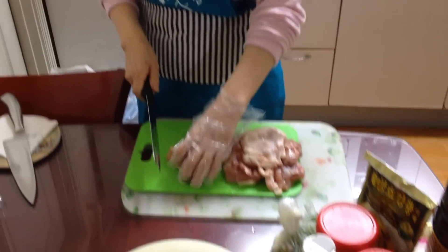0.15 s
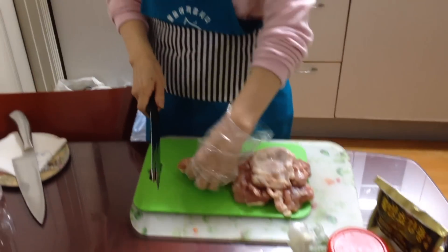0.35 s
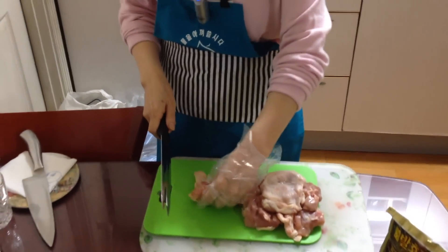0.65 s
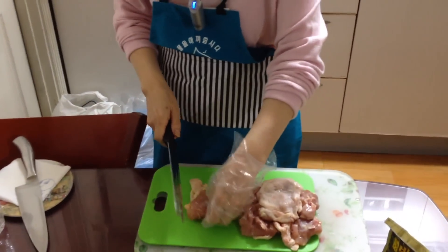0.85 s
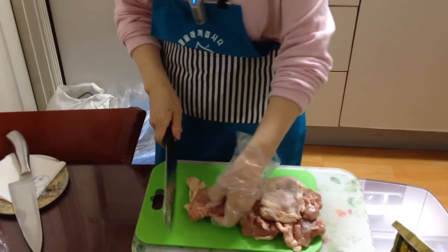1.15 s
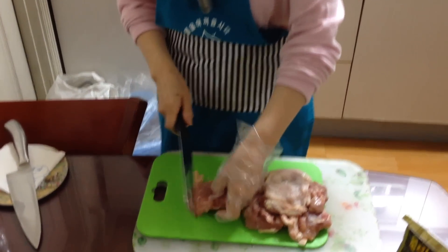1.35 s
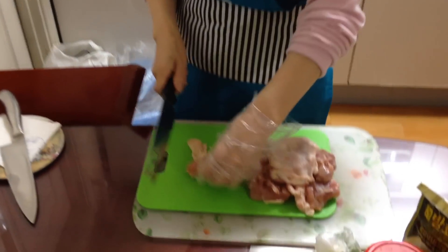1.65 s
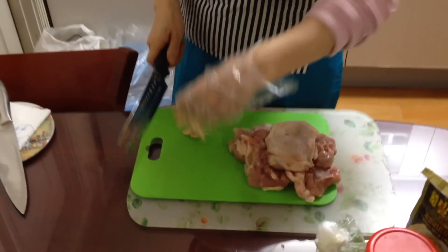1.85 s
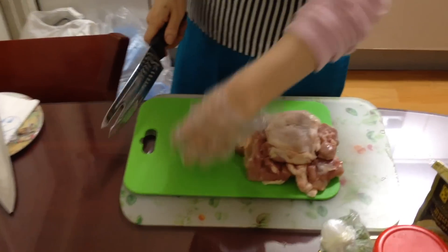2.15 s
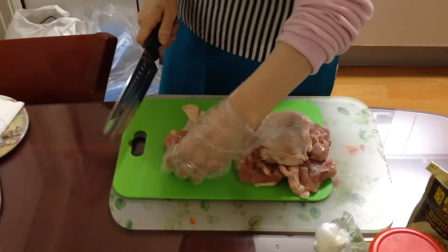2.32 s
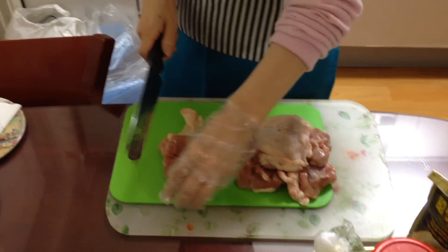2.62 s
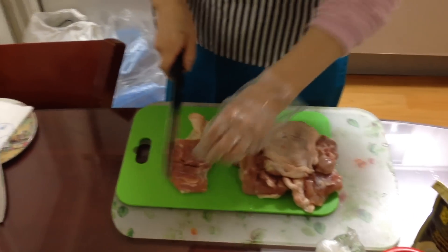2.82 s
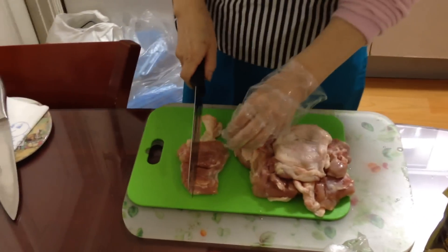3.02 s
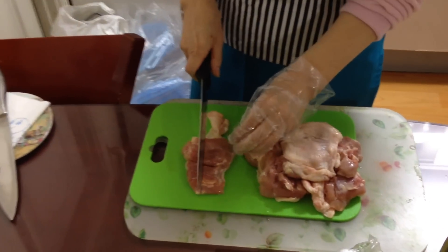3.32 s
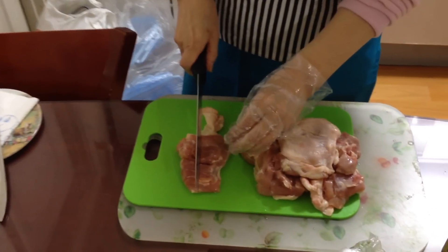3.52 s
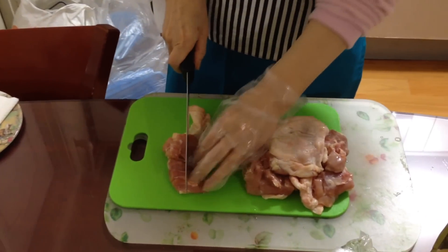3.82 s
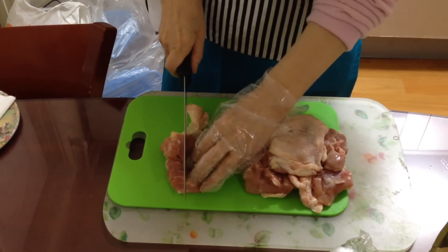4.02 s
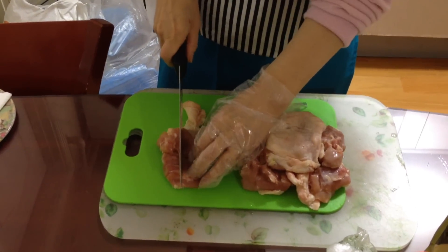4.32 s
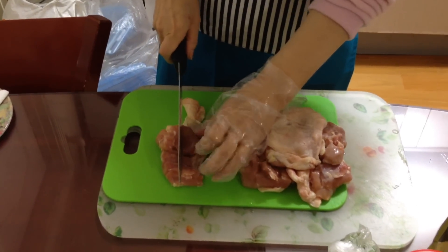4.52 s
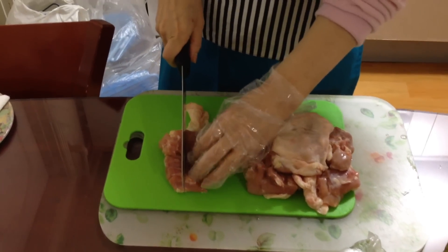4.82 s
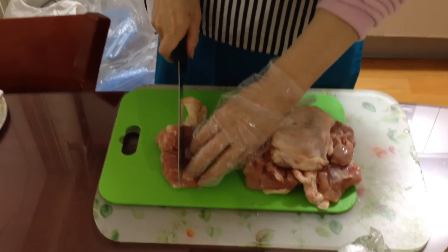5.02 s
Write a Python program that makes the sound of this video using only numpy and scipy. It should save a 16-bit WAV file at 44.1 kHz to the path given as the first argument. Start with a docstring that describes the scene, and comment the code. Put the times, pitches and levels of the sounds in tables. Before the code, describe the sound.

A thin plastic glove crinkles and crackles busily, with a few small knife knocks on a plastic board, then thins to sparse ticks in a quiet kitchen.

```python
"""A thin plastic glove crackles as the hand in it handles raw meat on a plastic cutting board.
Dense tiny damped grains make the rasp of the film; larger bursts make its single snaps, and trapped air rings.
A blade or knuckle excites the modes of the board, the blade ticks on it and meat flops as soft low pushes.
Filtered noise is the quiet kitchen air and a humming appliance; decaying noise is the small room's answer."""
import sys
import numpy as np
from scipy import signal
from scipy.fft import rfft, irfft, next_fast_len
from scipy.io import wavfile
from scipy.ndimage import map_coordinates

SR = 44100
rng = np.random.default_rng(int(sys.argv[2]) if len(sys.argv) > 2 else 0)


def generate_wav(sig):
    """Save sig (samples, or channels by samples) to the path in sys.argv[1] as 16-bit PCM at SR."""
    pcm = np.round(np.clip(np.atleast_2d(sig).T, -1, 1) * 32767).astype(np.int16)
    wavfile.write(sys.argv[1], SR, pcm)


N = 227600  # length in samples

# Table levels are relative: each sound's function adds its own trim.
# the hand's steady fidgeting in the glove: [t/s, crackle level/dB]
FIDGETING = [(0, -45.5), (.08, -45), (.19, -44), (.3, -43), (.6, -42.5), (.72, -51), (.93, -43),
             (1.15, -49.5), (1.3, -47), (1.7, -50.5), (2.15, -57.5), (2.45, -45.5), (2.7, -46), (2.8, -54),
             (3.05, -59.5), (3.3, -72), (3.56, -80), (3.75, -50.5), (3.97, -49.5), (4.03, -53), (4.09, -61),
             (4.14, -86), (4.3, -81), (4.45, -64), (4.75, -57.5), (4.815, -62), (4.86, -57.5),
             (4.92, -58.5), (4.955, -66), (4.99, -57), (5.16, -63)]
# squeezes of the glove that swell to a peak and die:
# [peak t/s, crackle level/dB, rise t/s, fall t/s, large-fold level/dB, middle-fold level/dB]
GLOVE_SQUEEZES = [(0.002, -27.5, 0.011, 0.01, -5, -5), (.166, -41.5, 0.0093, 0.011, 15.5, -2),
                  (.215, -40, 0.0086, .03, -17, -2), (.228, -36, 0.012, 0.043, -2, -6),
                  (.33, -41, 0.068, 0.05, 5, 2), (.372, -35.5, 0.015, 0.033, -1, 1.5),
                  (0.394, -34.5, 0.019, 0.019, -4, 0), (.418, -45, .03, .01, 6, -3),
                  (0.489, -35, 0.043, 0.019, -2, 3), (.63, -44, 0.14, 0.015, -8, -5),
                  (0.809, -41.5, 0.2, 0.06, 0.5, 4), (.885, -39, 0.039, 0.042, -6, -3),
                  (.98, -41, 0.028, 0.018, -3, 3), (1.21, -39, 0.018, 0.014, -2, 2.5),
                  (1.25, -49, .03, 0.18, 4, 13), (1.425, -39, 0.016, 0.029, 0.5, 3.5),
                  (1.45, -37.5, .008, 0.065, 2, 5.5), (1.521, -34.5, 0.047, 0.015, -6.5, -2),
                  (1.639, -40.5, 0.094, 0.059, 1.5, 0), (2.281, -43, 0.13, 0.082, -3.5, 3),
                  (2.375, -45, 0.012, 0.065, 5.5, 5), (2.48, -49, 0.066, 0.045, -19, -14),
                  (2.54, -37.5, 0.056, 0.07, -5, -0.5), (2.64, -42, 0.027, 0.064, 3.5, -7),
                  (2.711, -40.5, 0.05, 0.023, -4, -7), (2.759, -41.5, .01, 0.012, -3, -11),
                  (3.04, -46.5, 0.075, 0.08, 3.5, -0.5), (3.22, -53, 0.042, 0.04, -7, -4),
                  (3.39, -55, 0.017, 0.035, 11, -1), (3.5, -56.5, 0.19, 0.02, 5, 5),
                  (3.79, -48.5, 0.051, 0.13, -2, -4), (3.89, -44, 0.16, 0.19, -0.5, 1),
                  (4.039, -44.5, .004, .015, 4, -3), (4.06, -49, .01, 0.014, 4, 0),
                  (4.096, -46, 0.0048, 0.0097, 3, -17), (4.33, -56.5, 0.017, 0.064, 6, 4),
                  (4.452, -48.5, 0.015, .05, 1, 9), (4.561, -40.5, 0.11, 0.042, -1.5, -5),
                  (4.689, -43.5, 0.018, 0.02, -4, -2), (4.724, -46, 0.028, 0.0094, -5, -0.5),
                  (5.11, -62, 0.07, 0.033, 14, 2)]
SWELL_DB = 10  # change in level over one rise or fall time
# colour of the glove film: [f/Hz, level/dB]
FILM_COLOUR = [(240, -42), (400, -4), (432, -0.5), (502, -3), (576, 1.5), (805, -5), (1140, -3),
               (1800, -3.5), (2130, -3.5), (2930, -3), (4280, -3), (6970, 1), (13000, -12), (15100, -24)]

# colour of the kitchen air and appliance: [f/Hz, level/dB]
AIR_COLOUR = [(29, -75), (50, -54.5), (169, -3.5), (254, -4), (381, -3), (572, -10), (645, -6), (819, -11),
              (1120, -9.5), (1350, -18.5), (1490, -16.5), (1760, -15.5), (2300, -19), (3500, -20.5),
              (5500, -21.5), (10600, -25.5), (15100, -24)]
AIR_DB = -58.5  # rms of the air before its slow changes
# fuzzy appliance lines: [f/Hz, half-width to 1/e f/Hz, rms level/dB]
HUM_LINES = [(167.6, 7.8, -76.5), (234, 51, -91), (370.8, 10.3, -68.5)]
# the background settles: [t/s, level/dB]
BACKGROUND_LEVEL = [(0, 1), (1.8, 1), (2.6, 1), (3.2, -0.7), (4.2, -0.3), (5.16, 0)]

# blade or knuckle on the board:
# [t/s, level/dB, hardness/(dB per octave), share of the free ring time left by the meat and hand]
BOARD_KNOCKS = [(.0008, -17, 5.5, 0.68), (.0022, -23, 4, .7), (.0045, -40, -1, 1.01),
                (0.2401, -21.5, 0.5, 0.38), (0.2421, -28.5, -3, 0.39), (0.296, -30.5, 3, .45),
                (0.4987, -32, -6.5, 0.36), (1.4828, -22.5, -0.5, 0.4), (2.2835, -31, 2, 0.27)]
# the board's modes when free: [f/Hz, level/dB, t60/s]
BOARD_MODES = [(393, -8, 0.015), (766, -10.5, 0.0074), (1187, -5.5, 0.029), (2330, -12, 0.0087),
               (2680, -14, 0.0043), (3060, -18, 0.019), (3880, -22, 0.013)]
# dry ticks of the blade's edge on the board: [t/s, level/dB]
BLADE_TICKS = [(.0021, -17), (.2402, -26), (.7194, -22), (.9722, -20), (1.4825, -15), (2.2835, -20),
               (2.3772, -26), (4.0977, -20), (4.3158, -30), (5.127, -37)]
TICK_HZ, TICK_CYCLES = 5800, 0.45  # pitch, cycles to decay to 1/e
# the room's tail: [f/Hz, t60/s]
ROOM_DECAY = [(300, 0.13), (2000, 0.14), (7000, 0.089), (13000, 0.15)]

# louder single buckles of the film: [t/s, level/dB, pitch f/Hz, low-fold level/dB]
LOUD_SNAPS = [(.041, -28, 5500, -15), (.0933, -34, 3880, -16), (.13, -26, 9000, -21),
              (.1341, -34, 6290, -17), (.165, -24, 6760, -7), (.1901, -29, 4570, -20),
              (.2117, -25, 6400, -18), (.2235, -20, 6720, -28), (.2325, -30, 2600, -20),
              (.2402, -15.5, 2630, -18), (.2957, -22, 11280, -23), (.3212, -17.5, 7600, -20),
              (.3335, -25, 4870, -17), (.3754, -21, 6960, -7), (.3906, -18, 7040, -19),
              (.4788, -20, 3020, -23), (.4838, -20, 4650, -18), (.535, -24, 6660, -12),
              (.5766, -34, 6800, -18), (.5844, -23, 8440, -19), (.6317, -28, 6720, -22),
              (.6381, -21, 6740, -19), (.6473, -27, 6800, -18), (.7079, -29, 7970, -20),
              (.7194, -21.5, 3060, -28), (.7327, -24, 7060, -18), (.7575, -27, 5000, -20),
              (.767, -21, 6340, -8), (.8253, -19, 6000, -28), (.829, -25, 6300, -25),
              (.8692, -21, 6850, -31), (.8749, -17, 6700, -22), (.8831, -19.5, 6900, -6),
              (.9333, -31, 6500, -23), (.957, -27, 7110, -8), (.9722, -17, 6860, -31),
              (.9765, -13.5, 10500, -31), (.9841, -21.5, 7580, -22), (.9985, -35, 7710, -20),
              (1.044, -28, 7050, -19), (1.0693, -26, 5600, -7), (1.095, -30.5, 9260, -19),
              (1.1111, -26.5, 2750, -1), (1.1156, -29, 5340, -22), (1.142, -25.5, 4730, -5),
              (1.1478, -29, 5600, -20), (1.183, -34, 6240, 5), (1.195, -19, 7150, -25),
              (1.2042, -27.5, 5140, 1), (1.2343, -27, 5060, -14), (1.247, -28, 3500, 1),
              (1.2922, -22.5, 6700, -19), (1.3096, -26, 6590, -18), (1.3175, -23.5, 8180, -10),
              (1.3396, -25, 7800, -22), (1.3437, -29, 4820, -20), (1.3646, -36, 2500, -17),
              (1.4085, -22.5, 7490, -12), (1.4162, -22, 8610, -19), (1.4301, -26, 3900, -17),
              (1.4485, -25, 7550, -19), (1.4819, -24, 5200, -20), (1.5154, -13, 7150, -27),
              (1.5211, -16.5, 3350, -19), (1.5322, -24, 3180, -12), (1.5925, -19, 6400, -27),
              (1.606, -29, 6740, -18), (1.618, -20, 6550, -23), (1.6334, -22, 7200, -24),
              (1.6537, -27, 7240, -20), (1.7314, -36, 6630, -20), (1.755, -39, 6680, -22),
              (1.7585, -31, 7750, -20), (1.769, -27, 7670, -25), (1.8009, -26, 10400, -29),
              (1.8121, -29, 5380, -20), (1.8159, -26.5, 8050, -24), (1.8382, -29, 7550, -30),
              (1.861, -31, 7700, -23), (1.9122, -23.5, 6200, -27), (1.9582, -26.5, 7700, -24),
              (1.9614, -25, 6400, -29), (1.9965, -25, 5550, -26), (2.0002, -30, 4950, -20),
              (2.022, -26.5, 7500, -25), (2.058, -29, 6840, -24), (2.0907, -43, 8010, -20),
              (2.1041, -31.5, 4950, -20), (2.1386, -31, 4690, -21), (2.1418, -40, 7110, -20),
              (2.1754, -32, 6000, -26), (2.189, -27, 5800, -15), (2.224, -33, 6070, -20),
              (2.2338, -30.5, 2400, 4), (2.2489, -24, 4260, -5), (2.272, -27, 6800, -26),
              (2.2832, -18.5, 3970, -20), (2.3375, -26, 2900, -21), (2.3665, -27, 2200, -20),
              (2.3725, -30, 3300, -20), (2.3772, -21.5, 3370, -18), (2.4338, -29, 8140, -21),
              (2.4521, -26, 8200, -20), (2.478, -29, 5730, -28), (2.5264, -19, 7460, -23),
              (2.533, -21.5, 2540, -16), (2.616, -30, 7600, -27), (2.6201, -29, 7750, -25),
              (2.6514, -20.5, 5860, -6.5), (2.7127, -22.5, 2860, -5), (2.7547, -24.5, 5850, -18),
              (2.759, -30, 5640, -16), (2.8111, -30, 7150, -9), (2.8404, -33, 7410, -22),
              (2.8617, -27.5, 4900, -29), (2.9043, -26.5, 7000, -27), (2.9076, -26, 5430, -22),
              (2.911, -30, 4610, -20), (2.9279, -30, 4730, -24), (2.958, -28.5, 7260, -30),
              (2.9676, -27, 7300, -30), (2.984, -30.5, 2930, -7), (3.002, -34, 7670, -22),
              (3.0202, -36, 6890, -21), (3.033, -25, 5900, -21), (3.0391, -26, 7800, -26),
              (3.062, -30, 7750, -15), (3.0937, -36, 7580, -20), (3.1082, -25.5, 6300, -4.5),
              (3.1456, -37, 6070, -20), (3.1934, -34, 6960, -21), (3.196, -27.5, 7100, -26),
              (3.2243, -29, 7300, -27), (3.2423, -36, 6500, -20), (3.249, -36, 6300, -19),
              (3.2916, -37, 6890, -18), (3.3864, -25, 7400, -25), (3.4124, -34.5, 6590, 2.5),
              (3.4342, -35, 5770, -18), (3.4527, -33.5, 7920, -2), (3.486, -47, 3700, -20),
              (3.4966, -37, 8050, -22), (3.5208, -33, 6640, -24), (3.534, -27, 8470, -12),
              (3.604, -32, 5460, -8.5), (3.6304, -30.5, 2840, -9), (3.6745, -44, 7280, -20),
              (3.6984, -37, 6760, -19), (3.7076, -32.5, 2900, -23), (3.7273, -27.5, 6930, -20),
              (3.7425, -36, 5860, -20), (3.7487, -28, 6600, -28), (3.7652, -27, 6370, -23),
              (3.7963, -23.5, 7710, -26), (3.8035, -23, 7200, -26), (3.8525, -29, 7200, -26),
              (3.8801, -27, 6200, -23), (3.9, -21, 7750, -19), (3.9316, -24.5, 7020, -5),
              (4.0025, -36, 6980, -20), (4.037, -30, 3830, -7), (4.0427, -29.5, 6850, -1),
              (4.0543, -29, 5080, -5), (4.0598, -36, 7410, -20), (4.0832, -43, 7650, -20),
              (4.0947, -30, 8800, -19), (4.098, -23.5, 4590, -28), (4.1523, -38, 5640, -8),
              (4.1658, -49, 6930, -20), (4.269, -49, 6800, -31.5), (4.3132, -29, 7110, -30),
              (4.3158, -20.5, 7700, -19), (4.33, -35, 11400, -14), (4.3435, -38, 12000, -20),
              (4.352, -34.5, 6930, -4), (4.3776, -43, 8790, -14), (4.4059, -38, 6160, -21),
              (4.4481, -27, 6900, -29), (4.463, -31, 4780, -1), (4.497, -27, 3370, -25),
              (4.512, -28, 6700, -33), (4.554, -31, 7060, -23), (4.5621, -23, 6750, -26),
              (4.5678, -19.5, 7800, -23), (4.5945, -26, 7800, -25), (4.6045, -26, 6850, -19),
              (4.6192, -42, 7840, -20), (4.6317, -39, 5080, -18), (4.6657, -37, 5810, 0),
              (4.6843, -26.5, 7040, -21), (4.6906, -34.5, 6100, 3), (4.717, -31, 4400, -24),
              (4.723, -30, 7040, -27), (4.762, -33, 4700, -18), (4.8334, -37, 8600, -19),
              (4.8605, -36.5, 5000, -17), (4.8849, -40, 3620, -13), (4.897, -39, 5730, -20),
              (4.9107, -38, 7150, 3), (4.9201, -42, 6630, -20), (4.9785, -40, 3570, 0),
              (4.9995, -42, 3500, 5), (5.0326, -38, 3170, -18), (5.0683, -38, 6420, -20),
              (5.0881, -38, 4800, 0), (5.1035, -30, 8650, -8), (5.1271, -30, 4760, -6)]
# small buckles: level above the quietest crackle and scatter below it; crackle floor; dB per dB of crackle
SMALL_DB, SMALL_SCATTER_DB = 12.5, 6
SMALL_FLOOR_DB, SMALL_GROWS = -77, 0.79
SMALL_HZ, SMALL_OCTAVES, SMALL_LOW_DB = 7640, 0.636, -24  # pitch near the top, downward scatter, low fold

# air pockets that ring while the glove crackles: [start t/s, length t/s, pitch f/Hz, level/dB]
AIR_POCKETS = [(0.155, 0.036, 4670, -36), (0.329, 0.009, 4800, -31), (.375, 0.012, 1330, -37),
               (.376, .012, 2250, -44), (.972, .028, 3200, -34), (1.226, 0.04, 1310, -38.5),
               (1.492, .02, 1190, -43), (1.51, 0.027, 3070, -35), (2.475, 0.013, 5800, -29),
               (2.524, .07, 2580, -34.5), (2.53, .05, 5800, -31), (2.636, 0.032, 5000, -40),
               (2.64, 0.047, 2870, -33.5), (2.693, 0.028, 2900, -35)]
POCKET_CYCLES, POCKET_SCATTER = 2.6, 0.12  # cycles to decay to 1/e, relative pitch scatter
# meat flopping on the board: [t/s, level/dB, pitch f/Hz, length t/s]
MEAT_FLOPS = [(1.482, -53, 376, 0.0092), (1.938, -54, 112, 0.02), (1.96, -56, 145, 0.023),
              (1.982, -47, 200, 0.018), (1.992, -53, 141, 0.011), (2.67, -63, 104, 0.037)]

TOP_HZ = 15280  # the microphone's band limit


def amp(db):
    """Decibels to gain."""
    return 10 ** (np.asarray(db) / 20)


def unit(x):
    """Scale to rms 1."""
    return x / np.sqrt(np.mean(x ** 2) + 1e-20)


def along(points, at):
    """Read [f/Hz, value] points on a log frequency axis."""
    f, v = np.transpose(points)
    return np.interp(np.log(at + 1), np.log(f + 1), v)


def wander(s, rate, points):
    """Smooth random movement at times s, with the given number of turning values per second."""
    return map_coordinates(rng.standard_normal(points), [s * rate])


def filtered(x, response):
    """Weight the spectrum of x by a response of frequency."""
    m = next_fast_len(N + 8192)
    return irfft(rfft(x, m) * response(np.fft.rfftfreq(m, 1 / SR)), m)[..., :N]


def coloured(x, spectrum):
    """A causal colour with peak gain 1, so that nothing rings before a click."""
    size = 4096
    db = along(spectrum, np.fft.rfftfreq(size, 1 / SR))
    # folding the cepstrum to positive times gives minimum phase
    cepstrum = irfft(np.log(amp(db - db.max()) + 1e-4), size)
    cepstrum[1:size // 2] *= 2
    cepstrum[size // 2 + 1:] = 0
    impulse = irfft(np.exp(rfft(cepstrum)), size)
    return signal.fftconvolve(x, impulse)[:N]


def grains(s, hz, cycles, gain, size=160):
    """Damped sines that swell for a moment; their decay falls to 1/e in the given number of cycles."""
    t = np.arange(size) / SR
    age = t * (hz / cycles)[:, None]
    envelope = np.exp(-age) * (1 - np.exp(-4 * age))
    wave = np.sin(2 * np.pi * hz[:, None] * t) * envelope * gain[:, None]
    wave *= np.cos(np.pi / 2 * np.arange(size) / size)  # ends without a step
    where = (s * SR).astype(int)[:, None] + np.arange(size)
    return np.bincount(where.ravel(), wave.ravel(), N + size)[:N]


def crumpling(s):
    """Squeezes and fidgeting add in power: crackle level, large-fold and middle-fold weight in dB at times s."""
    peak, db, rise, fall, low_db, mid_db = np.transpose(GLOVE_SQUEEZES)
    late = s[:, None] - peak
    swells = np.where(late < 0, -late / np.abs(rise), late / np.abs(fall))
    power = amp(2 * (db - SWELL_DB * swells))
    total = power.sum(axis=1) + amp(2 * np.interp(s, *np.transpose(FIDGETING)))
    return 10 * np.log10(total), power @ low_db / total, power @ mid_db / total


def crackle(count=22000, calm_db=6.0, busy_db=0.5, clump_db=1.16, cycles=1.43):
    """Countless small folds flip, each at its own pitch; they come in clumps of a few milliseconds."""
    u = rng.random((count, 5))
    s = u[:, 0] * (N - 1) / SR
    hz = 600 * amp(27.92 * u[:, 1])
    level_db, low_db, mid_db = crumpling(s)
    # a resting hand gives a few ticks among faint ones, a busy hand an even rasp
    spread_db = np.interp(level_db, [-56, -42], [calm_db, busy_db])
    size_db = -spread_db * (np.log(u[:, 2] + .01) + 2)
    size_db += clump_db * wander(s, 150, 1000)
    size_db += 1.62 * wander(s, 40, 300)  # and in slower surges
    life = cycles * (.5 + u[:, 3])
    sign = np.sign(u[:, 4] - .5)
    gain = amp(size_db) * sign * hz / np.sqrt(life)
    even_rms = np.sqrt(np.mean(coloured(grains(s, hz, life, gain), FILM_COLOUR) ** 2))
    # large folds and wet meat sound low, small folds high
    low = 1 / (1 + (hz / 1800) ** 8)
    high = 1 / (1 + (3900 / hz) ** 8)
    middle = 1 - low - high
    shape_db = low * (low_db + 2.0) + middle * (mid_db + 0.44)
    shape_db += high * 0.67 * wander(s, 12, 100) * np.log2(hz / 6500)  # the treble tilts to and fro
    gain = gain * amp(level_db + shape_db - 2.5) / even_rms
    return coloured(grains(s, hz, life, gain), FILM_COLOUR)


def air():
    """Steady kitchen noise that drifts a little, with narrow noise bands as the appliance's hum."""
    t = np.arange(N) / SR
    drift = wander(t, 1.5, 40)
    noise = filtered(rng.standard_normal(N), lambda f: amp(along(AIR_COLOUR, f)))
    bed = amp(AIR_DB + 0.5 * drift) * unit(noise)
    hum = np.zeros(N)
    for hz, width, db in HUM_LINES:
        line = filtered(rng.standard_normal(N), lambda f: np.exp(-((f - hz) / width) ** 2))
        hum += amp(db) * unit(line)
    settling = amp(np.interp(t, *np.transpose(BACKGROUND_LEVEL)))
    return settling * (bed + hum)


def knocks():
    """Each knock rings the same board modes at new strengths, with a short noise crack."""
    out, t = np.zeros(N + SR), np.arange(SR // 8) / SR
    for s, db, hard_db, free in BOARD_KNOCKS:
        hit = np.zeros(len(t))
        for k, (hz, level, t60) in enumerate(BOARD_MODES):
            mode_db = level + hard_db * np.log2(hz / 1160) + 2 * rng.standard_normal()
            sine = np.sin(2 * np.pi * hz * t + np.pi * k)  # alternate modes swing the other way
            hit += amp(mode_db - 60 * t / (free * t60)) * sine
        hit += amp(-32.0 + 0.8 * hard_db - 60 * t / 0.0081) * rng.standard_normal(len(t))
        out[round(s * SR):][:len(t)] += amp(db) * hit
    # a small board radiates no bass
    return signal.sosfilt(signal.butter(4, 220, "high", fs=SR, output="sos"), out)[:N]


def ticks():
    """The blade's edge gives one broad swing, damped too fast to ring and stripped of bass."""
    s, db = np.transpose(BLADE_TICKS)
    swing = grains(s, np.full(len(s), TICK_HZ), np.full(len(s), TICK_CYCLES), -amp(db + 3.5))
    return signal.sosfilt(signal.butter(2, 900, "high", fs=SR, output="sos"), swing)


def kitchen(x, count=110):
    """The room's tail is noise that decays at each pitch's own rate, drawn anew as the hand moves about."""
    hz, t, z = signal.stft(rng.standard_normal((count, SR // 5)), SR, nperseg=256)
    decay = amp(-60 * t / along(ROOM_DECAY, hz)[:, None])
    tails = signal.istft(z * decay, SR, nperseg=256)[1]
    # the walls answer after a few milliseconds
    tails = tails * (1 - np.exp(-np.arange(tails.shape[1]) / SR / 0.0026))
    tails = tails / np.linalg.norm(tails, axis=1, keepdims=True)
    step, out = N // count + 1, np.zeros(N + SR)
    for k in range(count):
        wet = signal.fftconvolve(x[k * step:(k + 1) * step], tails[k])
        out[k * step + 60:][:len(wet)] += wet  # 60 samples of delay
    return out[:N]


def buckles(count=220):
    """The listed snaps and a random scatter of smaller ones that grow with the crackle."""
    u = rng.random((count, 4))
    s = u[:, 0] * (N - 1) / SR
    above_floor = np.maximum(crumpling(s)[0] - SMALL_FLOOR_DB, 0)
    db = SMALL_FLOOR_DB + SMALL_GROWS * above_floor
    db = db + SMALL_DB + SMALL_SCATTER_DB * np.log(u[:, 1] + .01)
    hz = SMALL_HZ * 2 ** (SMALL_OCTAVES * np.log(u[:, 2] + 0.11) + 0.18)
    small = np.transpose([s, db, hz, SMALL_LOW_DB + 16 * (u[:, 3] - .5)])
    return np.vstack([LOUD_SNAPS, small]).T


def snaps(count=5):
    """A large fold flips in a short burst: a ring at its pitch, a cluster of neighbouring flips, a lower ring."""
    s, db, hz, low_db = buckles()
    u = rng.random((len(s), count + 1, 3)).swapaxes(0, 1)
    one = np.ones(len(s))
    ring = grains(s, hz, 2.6 * (hz / 7000) ** 0.35, amp(db - 4.0))  # larger folds are more damped
    flips = np.zeros(N)
    for v in u[1:]:
        when = s - .0003 + .0016 * v[:, 0]
        pitch = 2200 * amp(16.0 * v[:, 1])
        flips += grains(when, pitch, 0.79 * one, amp(db - 1.7 - 14.0 * v[:, 2]))
    low = grains(s, 1000 + 500 * u[0, :, 0], 1.16 * one, amp(db + low_db - 6.0), size=320)
    edge = grains(s, 11000 * one, 0.5 * one, amp(db + 6.5))  # the first flip is a broad tick
    return ring + coloured(flips + edge, FILM_COLOUR) + low


def pockets(count=24):
    """Irregular flips of the film excite each air pocket's one resonance."""
    start, length, hz, db = np.transpose(AIR_POCKETS)[..., None]
    u = rng.random((len(AIR_POCKETS), count, 3))
    s = start + length * u[..., 0]
    pitch = hz * (1 + POCKET_SCATTER * (2 * u[..., 1] - 1))
    gain = amp(db - 3.0 * np.log(u[..., 2] + 0.022) - 8)
    return grains(s.ravel(), pitch.ravel(), np.full(s.size, POCKET_CYCLES), gain.ravel(), size=400)


def flops():
    """Soft meat meets the board in one low push that swells and dies."""
    out, t = np.zeros(N + SR), np.arange(SR // 8) / SR
    for s, db, hz, length in MEAT_FLOPS:
        swell = np.sin(np.pi * np.clip(t / length, 0, 1)) ** 2
        out[round(s * SR):][:len(t)] += amp(db) * swell * np.sin(2 * np.pi * hz * t)
    return out[:N]


def scene():
    """Glove, blade, board and meat, their room and the kitchen air."""
    # the table's reflection thins a narrow band
    dip = lambda f: 1 - .5 * np.exp(-((f - 1720) / 220) ** 2)
    glove = crackle() + snaps() + pockets()
    near = filtered(glove + ticks() + knocks() + flops(), dip)
    return (near + amp(-5.0) * kitchen(near) + air())[None]


def record(dry):
    """The microphone drops the deep bass, fades at the top and keeps nothing above its band limit."""
    bass = signal.butter(3, 80, "high", fs=SR, output="sos")
    return filtered(signal.sosfilt(bass, dry), lambda hz: (hz < TOP_HZ) / (1 + (hz / 14500) ** 16))


dry = scene()
out = record(dry)
generate_wav(out)
```